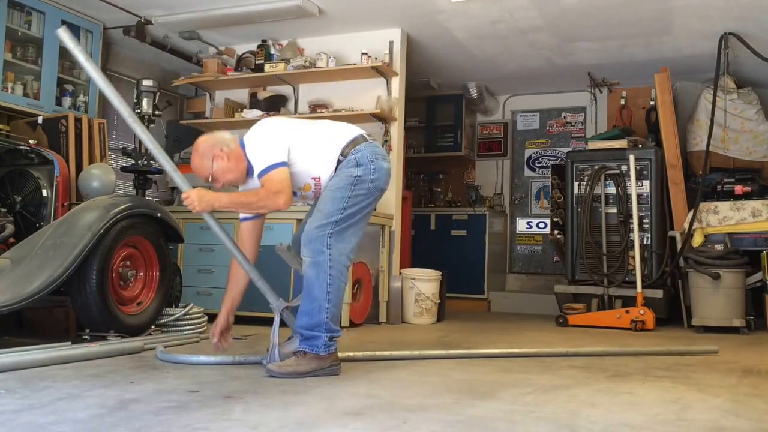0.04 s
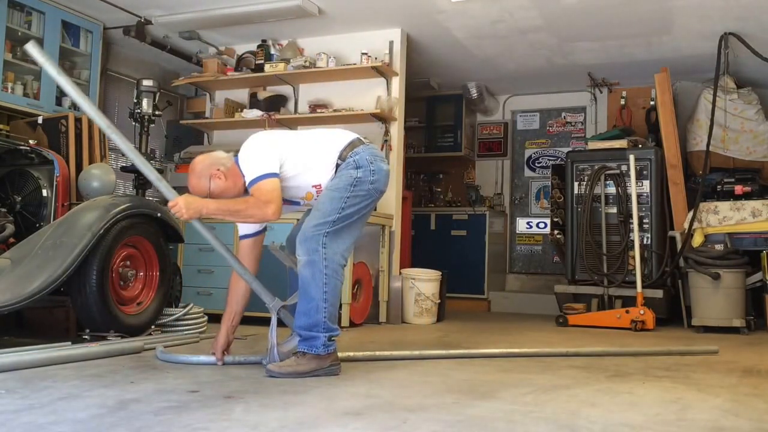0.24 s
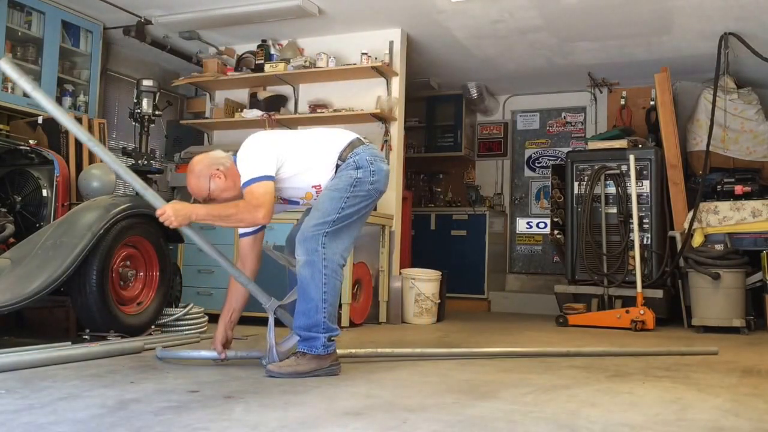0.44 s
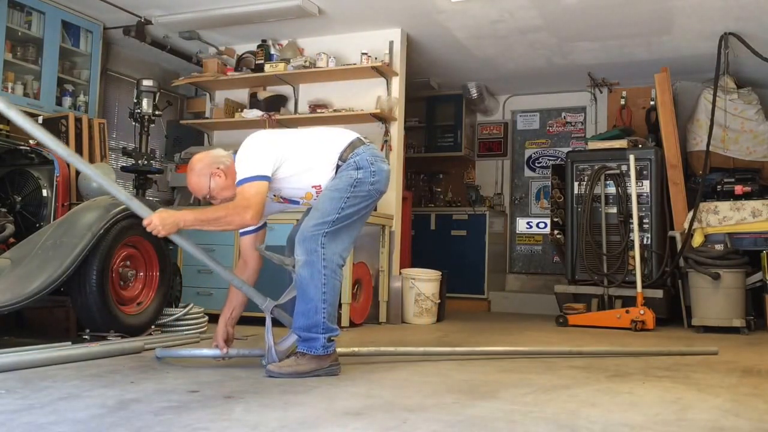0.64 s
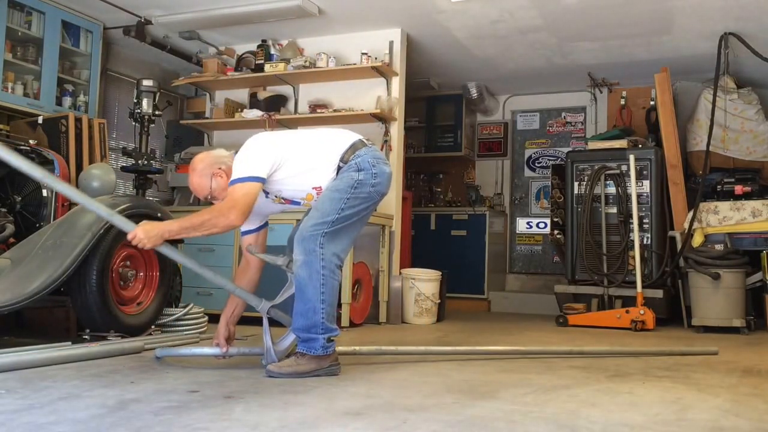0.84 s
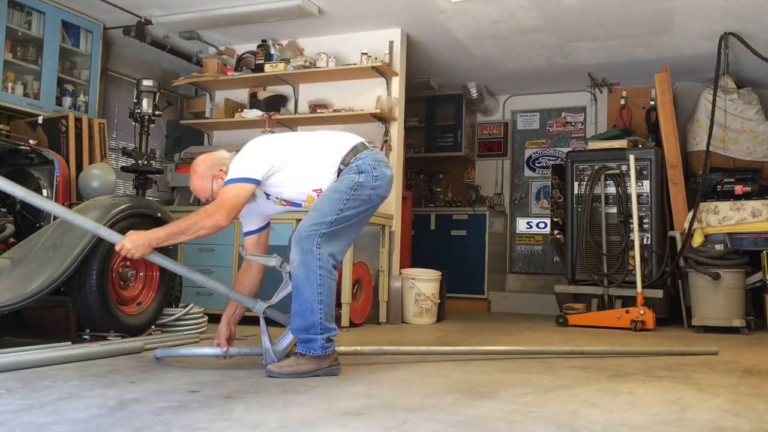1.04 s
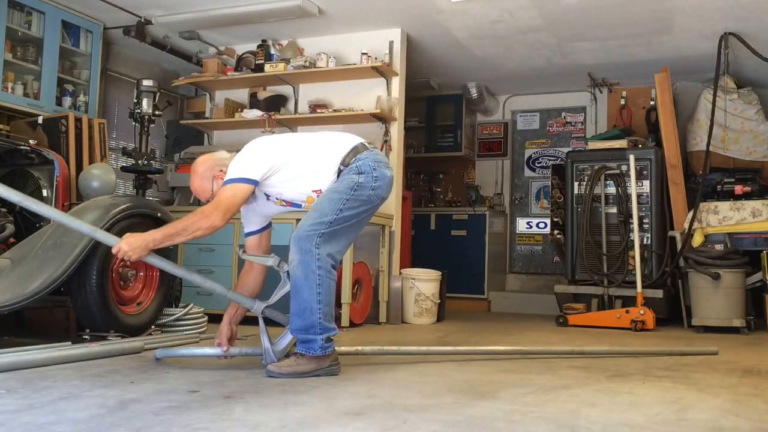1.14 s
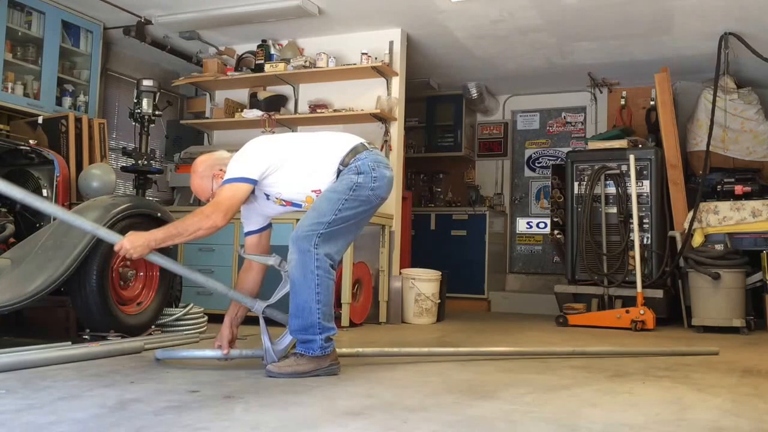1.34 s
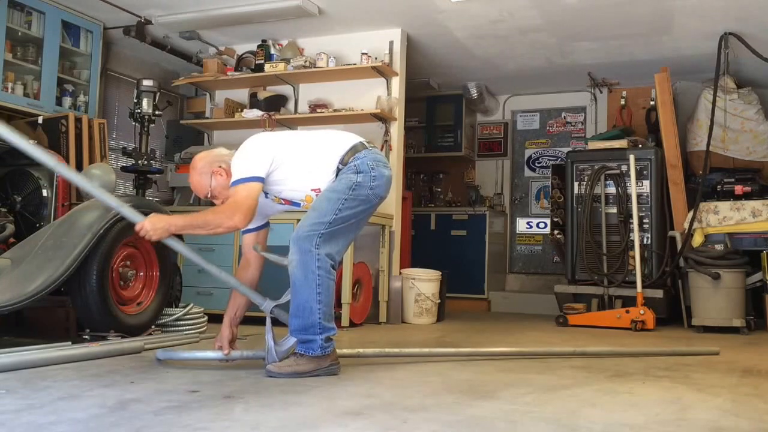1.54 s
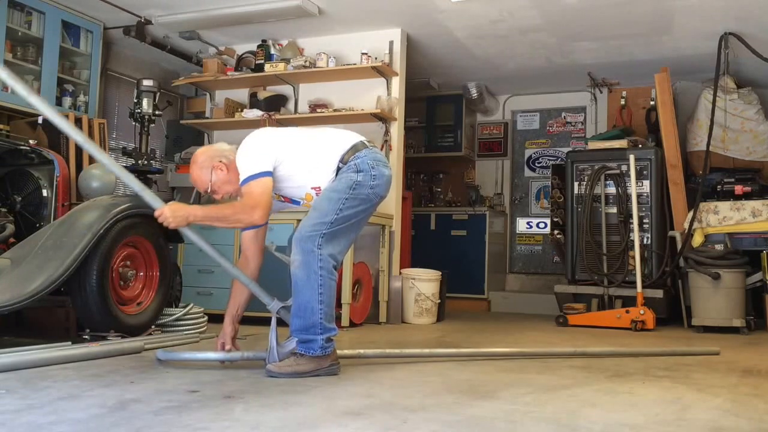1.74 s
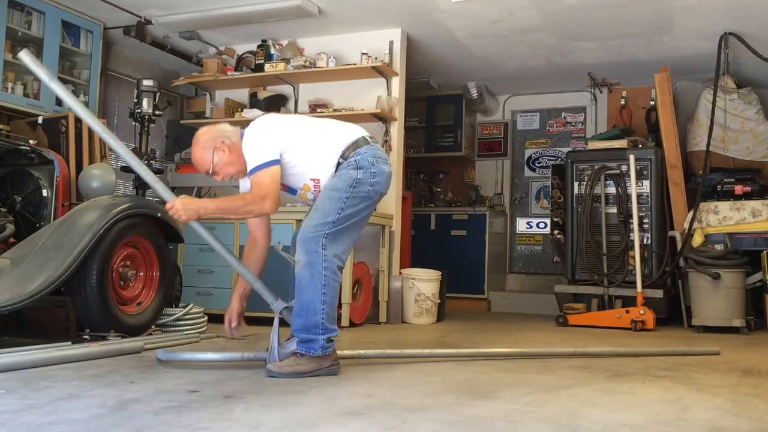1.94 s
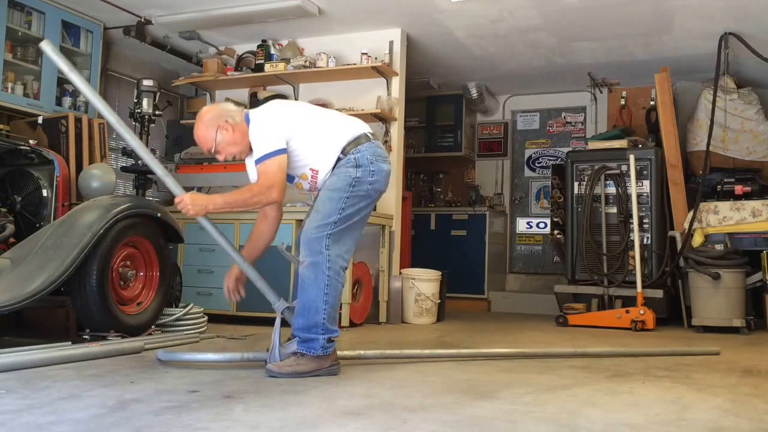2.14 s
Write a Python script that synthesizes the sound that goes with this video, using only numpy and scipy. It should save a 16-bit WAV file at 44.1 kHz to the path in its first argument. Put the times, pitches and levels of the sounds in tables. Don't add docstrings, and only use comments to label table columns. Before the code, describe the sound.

Hollow metal conduit knocks and clatters on a concrete floor in three uneven bursts, ringing briefly with short garage reverberation over low hum; light scraping precedes the last burst, a shoe scuff follows. Mono, moderately close.

```python
import sys
import numpy as np
from scipy import signal
from scipy.fft import rfft, irfft, next_fast_len
from scipy.io import wavfile

SR = 44100
rng = np.random.default_rng(int(sys.argv[2]) if len(sys.argv) > 2 else 0)


def bounce(signal):
    frames = np.transpose(np.atleast_2d(signal))
    limited = np.clip(frames, -1, 1)
    pcm = np.round(limited * 32767).astype(np.int16)
    wavfile.write(sys.argv[1], SR, pcm)


def ratio(d):
    e = np.asarray(d, float) / 20
    return 10 ** e


N = 96623

# pitch_hz, density_db (per Hz)
AIR_SPECTRUM = [(25, -32), (60, -6.5), (200, -16), (500, -25), (1000, -26.5), (3500, -30), (8000, -40.5),
                (15500, -58.5)]
# pitch_hz, width_hz, level_db
HUM_BANDS = [(78.8, 17.3, -58.5), (115, 5.9, -63.5), (145, 43, -66)]
# time_s, level_db
DRONE_LEVEL = [
    (0, -74.5),
    (1.85, -79.5),
    (1.94, -65.5),
    (2.0, -74.5),
    (2.05, -64),
    (2.19, -65),
]
# start_s, level_db, centre_hz (most excited bending pitch), wall_db (relative), rattle_t60_s
CONTACTS = [(0.39, -42.5, 1200, -3, 0.38), (.411, -29.5, 1500, 2, .12), (0.427, -31, 1200, 2.5, 0.14),
            (.452, -32.5, 2040, -2.5, 0.21), (0.518, -42.5, 1300, 0.5, 0.69), (0.586, -47, 1200, -3.5, 1),
            (.623, -46.5, 1200, 1.5, 1), (.702, -25.5, 950, -7, 0.17), (.722, -28.5, 1400, -1, 0.2),
            (0.756, -26.5, 1440, -2.5, 0.27), (.8, -27.5, 1400, -4, 0.13), (.865, -39.5, 1580, -34, 0.049),
            (1.023, -40.5, 1100, -6.5, 0.37), (1.057, -36.5, 1390, -12.5, 0.086),
            (1.148, -55.5, 1200, -3.5, 1), (1.225, -51.5, 1200, 5.5, 1), (1.25, -32, 1670, -2.5, 0.73),
            (1.279, -21.5, 1150, -5, 0.18), (1.31, -29, 1150, 0.5, 0.37), (1.344, -29.5, 1200, 8.5, 0.15),
            (1.358, -21, 2420, 2, 0.23), (1.403, -32.5, 1700, 7.5, 0.23), (1.437, -35, 1900, -13.5, 0.1),
            (2.184, -54, 1200, -7.5, .1)]
# pitch_hz; then, in the same order, level_db, t60_s
BENDING_HZ = [570, 722, 860, 945, 1112, 1322, 1555, 1585, 1820, 1846, 2104, 2341, 2620, 2902]
BENDING_RING = [(-4.5, .2), (-2.5, 0.13), (-7.5, 0.24), (0.5, 0.12), (-2.5, 0.15), (-3, 0.19), (-7, 0.25),
                (-6, 0.47), (-5, 0.16), (-3, 0.19), (-6, .25), (-7, 0.24), (-7.5, 0.35), (-13.5, 0.9)]
# pitch_hz; then, in the same order, level_db, t60_s
WALL_HZ = [3270, 3521, 3660, 3955, 4147, 4286, 4382, 4573, 5180, 5338, 5880, 6653, 6853, 7080]
WALL_RING = [(-8.5, 0.12), (-5, .25), (0, 0.21), (0, 0.1), (0.5, .25), (-5, 0.22), (-4, 0.18), (-1.5, 0.26),
             (-6, 0.091), (-6, .25), (-11, 0.23), (-6, 0.17), (-12.5, .3), (-9.5, 0.21)]
# pitch_hz, level_db
CROWD_SPECTRUM = [(3040, -10), (4500, -9.5), (6000, -15), (8250, -20), (8560, -12.5), (11000, -21.5),
                  (13500, -28), (15500, -36)]
# pitch_hz, width_hz, level_db
SLAB_BANDS = [(206.5, 169, -0.5), (397, 265, 3.5), (703, 270, 6), (1150, 610, 5.5), (1900, 540, -5)]
THUD_HZ = [172, 240, 365]
# start_s, near_hz, level_db, t60_s
CLEAN_KNOCKS = [(.425, 945, -35, 0.28), (.43, 1846, -25, 0.18), (.432, 2341, -31, 0.59),
                (.412, 5338, -27, 0.19), (0.412, 5880, -31.5, 0.083), (.413, 5180, -30, .12),
                (.44, 1555, -32, 0.47), (.45, 2104, -28.5, 0.24), (.45, 2620, -38.5, 0.43),
                (.702, 1112, -29, 0.6), (.703, 945, -27, 0.15), (.74, 1846, -27, 0.2),
                (.76, 1322, -36, 0.88), (.865, 1585, -27.5, 0.23), (1.06, 1585, -45, 0.39),
                (1.255, 1820, -42, .2), (1.279, 1112, -17, 0.23), (1.28, 1322, -18, 0.33),
                (1.277, 172, -34, 0.073), (1.349, 240, -35.5, 0.21), (1.35, 365, -38, .2),
                (1.28, 945, -25, 0.2), (1.28, 1820, -21, 0.11), (1.285, 722, -32.5, 0.41),
                (1.358, 2341, -20, 0.55), (1.36, 2104, -40, 0.47), (1.4, 1846, -25, 0.22),
                (1.44, 1585, -28.5, 0.41), (1.36, 2620, -44, 0.26)]
# start_s, level_db
TOUCHES = [
    (0.586, -44.5),
    (.868, -39),
    (1.363, -38),
    (1.463, -34.5),
]
# pitch_hz; then, in the same order, level_db, t60_s
OVAL_HZ = [3019.5, 3029.7, 3085]
OVAL_RING = [(-1, 0.85), (-3.5, 1), (-12.5, 0.27)]
# time_s, level_db
GRIT_LEVEL = [
    (.9, -95),
    (.98, -63),
    (1.03, -71),
    (1.1, -81.5),
    (1.17, -69),
    (1.22, -55),
    (1.26, -60),
    (1.32, -98),
]
# time_s, level_db
SCUFF_LEVEL = [
    (1.66, -92),
    (1.76, -66.5),
    (1.84, -60.5),
    (1.92, -67),
    (2.05, -96.5),
]

RATTLE_PER_S, RATTLE_DB, RATTLE_SPREAD_DB, KNOCK_DB = 2000, -10, 3, -3.5
TUBE_DB, STRIKE_SPREAD_DB = -4, 2
DAMPING = 0.48
BEND_FALL_DB = 7.5
CROWD_T60_S, CROWD_SPREAD_DB = 0.23, 1.5
WALL_MODE_LOW_CUT_HZ, LOW_CUT_HZ = 2300, 175
SLAB_DB = 21
AIR_DB, DRONE_HZ = -58.5, 495
ROOM_DB, ROOM_T60_S, WALL_CUT_HZ = -4, 0.41, 11400
ACCENT_SEND_DB = -8.5


def rms_one(x):
    return x / np.sqrt(np.mean(x ** 2) + 1e-20)


def in_time(rows):
    return ratio(np.interp(np.arange(N) / SR, *np.transpose(rows)))


def at_hz(points, hz):
    point_hz, level_db = np.transpose(points)
    return np.interp(np.log(hz), np.log(point_hz), level_db)


def cut(x, hz, order):
    return signal.sosfilt(signal.butter(order, hz, "high", fs=SR, output="sos"), x)


def strike(start_s, level_db):
    clicks = np.zeros(N)
    clicks[int(start_s * SR)] = ratio(level_db)
    return clicks


def ring(clicks, hz, t60_s):
    r = ratio(-60 / (t60_s * SR))
    w = 2 * np.pi * hz / SR
    return signal.lfilter([0, np.sin(w)], [1, -2 * r * np.cos(w), r * r], clicks + 1e-18)


def peak(x, hz, width_hz):
    r = np.exp(-np.pi * width_hz / SR)
    poles = [1, -2 * r * np.cos(2 * np.pi * hz / SR), r * r]
    return signal.lfilter([(1 - r * r) / 2, 0, (r * r - 1) / 2], poles, x + 1e-18)


def narrow(hz, width_hz):
    noise = rng.standard_normal(N + SR)
    return rms_one(peak(peak(noise, hz, width_hz), hz, width_hz)[SR:])


def background():
    hz = np.fft.rfftfreq(N, 1 / SR) + 1
    spectrum = rfft(rng.standard_normal(N)) * ratio(at_hz(AIR_SPECTRUM, hz))
    air = ratio(AIR_DB) * rms_one(irfft(spectrum, N))
    hum = sum(ratio(level_db) * narrow(pitch_hz, width_hz) for pitch_hz, width_hz, level_db in HUM_BANDS)
    sine = np.sqrt(2) * np.sin(2 * np.pi * DRONE_HZ * np.arange(N) / SR)
    return air + hum + in_time(DRONE_LEVEL) * sine


def rattles():
    spread_db = RATTLE_SPREAD_DB * np.minimum(rng.exponential(size=N), 3)
    sizes = ratio(RATTLE_DB + spread_db) * np.sign(rng.standard_normal(N))
    clicks = sizes * (rng.random(N) < RATTLE_PER_S / SR)
    rows = np.zeros((len(CONTACTS), N))
    for row, (start_s, level_db, _, _, t60_s) in zip(rows, CONTACTS):
        start = int(start_s * SR)
        decay = np.exp(-np.log(1000) * np.arange(N - start) / SR / t60_s)
        row[start:] = clicks[start:] * ratio(level_db) * decay
        row[start] += ratio(level_db + KNOCK_DB)
    return rows


def conduit(rows):
    _, _, centre_hz, wall_db, _ = np.transpose(CONTACTS)
    modes = []      # pitch_hz, level_db for each contact, t60_s
    for hz, (level_db, t60_s) in zip(BENDING_HZ, BENDING_RING):
        octaves = np.log2(hz / centre_hz)
        modes.append((hz, level_db - BEND_FALL_DB * octaves ** 2, DAMPING * t60_s))

    wall_modes = [(hz, level_db, t60_s) for hz, (level_db, t60_s) in zip(WALL_HZ, WALL_RING)]
    for hz in np.geomspace(3040, 15400, 220) * rng.uniform(.997, 1.003, 220):
        level_db = at_hz(CROWD_SPECTRUM, hz) + CROWD_SPREAD_DB * rng.normal()
        wall_modes.append((hz, level_db, CROWD_T60_S * (4000 / hz) ** 1.28))
    modes += [(hz, level_db - 8 + wall_db, DAMPING * t60_s) for hz, level_db, t60_s in wall_modes]

    chance = rng.standard_normal((len(rows), 2, len(modes)))
    levels_db = np.array([level_db for _, level_db, _ in modes])
    strengths = ratio(TUBE_DB + levels_db + STRIKE_SPREAD_DB * chance[:, 0].T)
    drives = (strengths * np.sign(chance[:, 1].T)) @ rows
    rung = [ring(drive, hz, t60_s) for drive, (hz, _, t60_s) in zip(drives, modes)]
    bending, wall = sum(rung[:len(BENDING_HZ)]), sum(rung[len(BENDING_HZ):])
    return cut(bending, LOW_CUT_HZ, order=2) + cut(wall, WALL_MODE_LOW_CUT_HZ, order=8)


def slab(rows):
    hits = rows.sum(axis=0)
    return sum(ratio(SLAB_DB + level_db) * peak(peak(hits, hz, width_hz), hz, width_hz)
               for hz, width_hz, level_db in SLAB_BANDS)


def garage(x):
    size = next_fast_len(N + SR)
    z = np.exp(-2j * np.pi * np.fft.rfftfreq(size))
    dull = np.exp(-2 * np.pi * WALL_CUT_HZ / SR)
    lowpass = (1 - dull) / (1 - dull * z)
    response = 0
    for k, lag in enumerate((rng.uniform(.015, .07, 30) * SR).astype(int)):
        loop = ratio(-60 * lag / SR / ROOM_T60_S) * lowpass * z ** lag
        response = response + (-1) ** k * loop / (1 - loop)
    return irfft(rfft(x, size) * response, size)[:N] / np.sqrt(20)


def clean_knocks():
    modes_hz = [*THUD_HZ, *BENDING_HZ, *WALL_HZ]
    total = 0
    for start_s, near_hz, level_db, t60_s in CLEAN_KNOCKS:
        hz = min(modes_hz, key=lambda mode_hz: abs(mode_hz - near_hz))
        total = total + ring(strike(start_s, level_db), hz, t60_s)
    return cut(total, 110, order=2)


def ovalling():
    clicks = sum(strike(start_s, level_db) for start_s, level_db in TOUCHES)
    return sum(ratio(level_db) * ring(clicks, hz, t60_s) for hz, (level_db, t60_s) in zip(OVAL_HZ, OVAL_RING))


def grit():
    return in_time(GRIT_LEVEL) * narrow(9800, width_hz=9000)


def scuff():
    return in_time(SCUFF_LEVEL) * narrow(4500, width_hz=3900)


def scene():
    rows = rattles()
    rattle = conduit(rows) + slab(rows)
    clean = clean_knocks()
    walls = ratio(ROOM_DB) * garage(rattle + ratio(ACCENT_SEND_DB) * clean)
    mix = rattle + clean + walls + ovalling() + scuff() + grit() + background()
    return mix[None]


def roll_off(x):
    return signal.sosfilt(signal.butter(12, 15950, fs=SR, output="sos"), x)


def record(dry):
    return roll_off(dry)


dry = scene()
out = record(dry)
bounce(out)
```